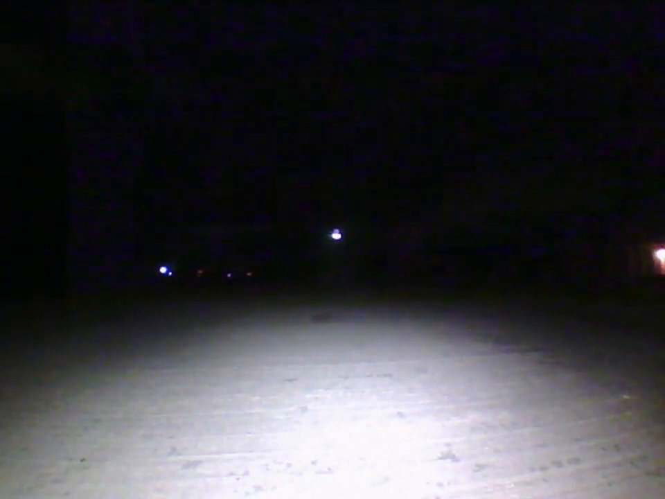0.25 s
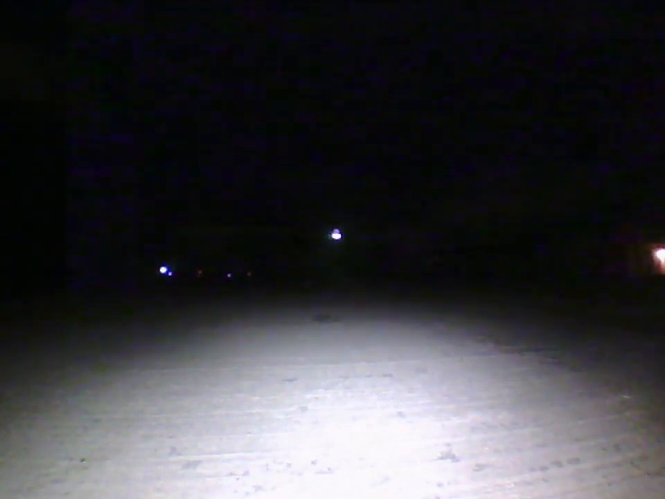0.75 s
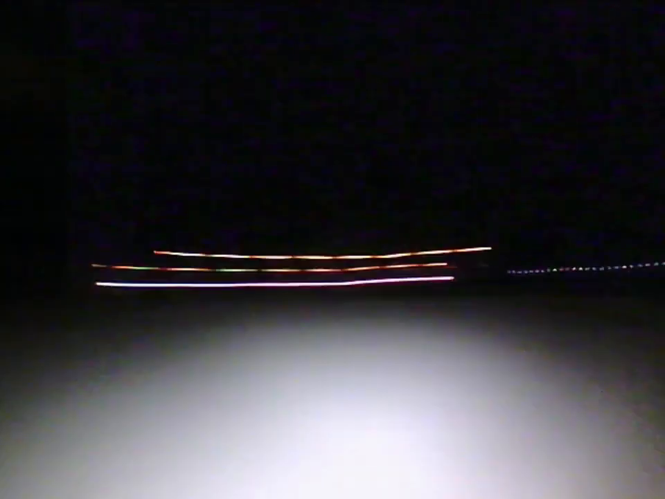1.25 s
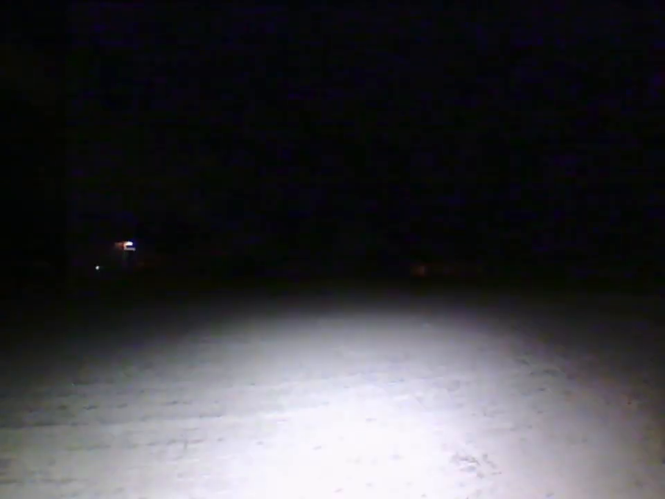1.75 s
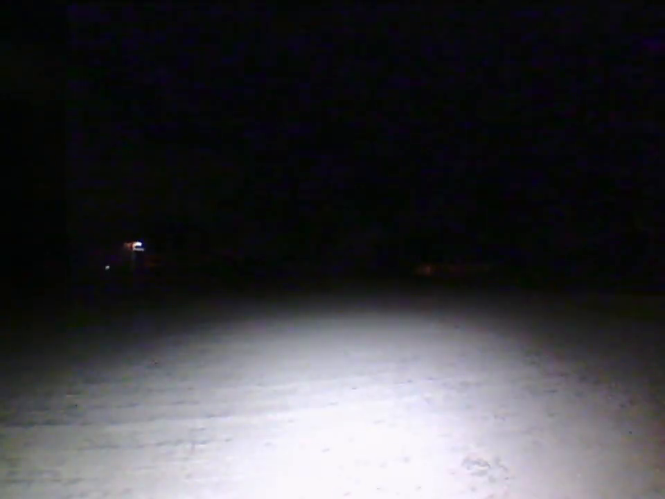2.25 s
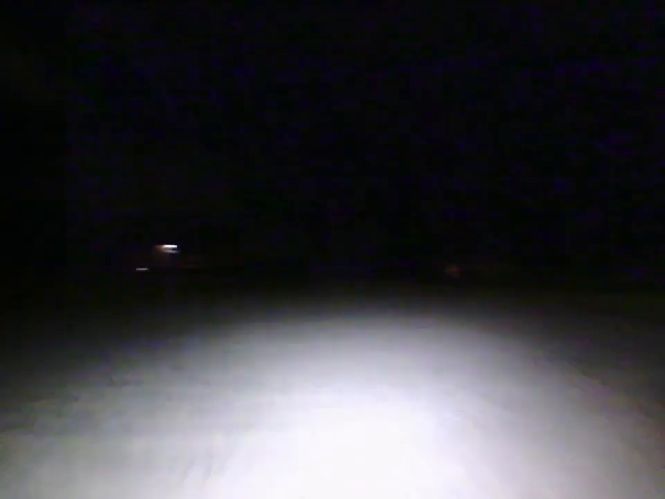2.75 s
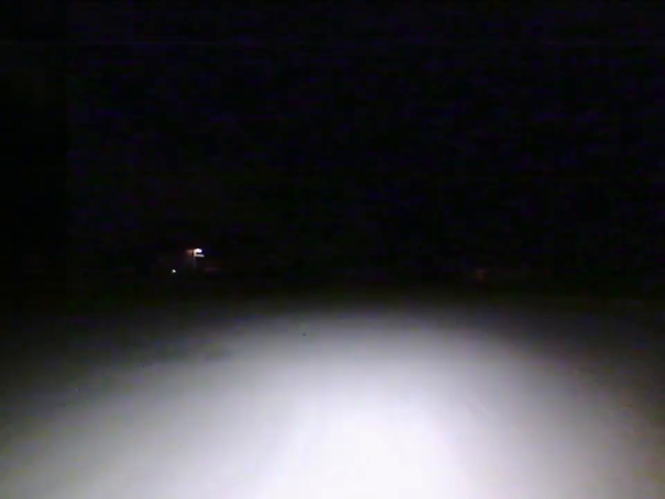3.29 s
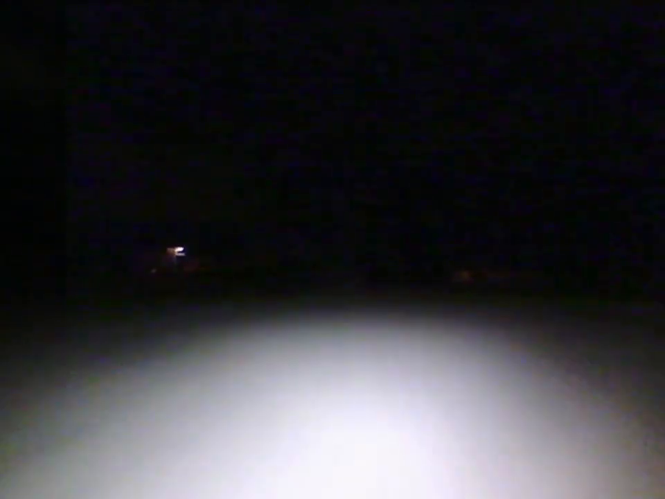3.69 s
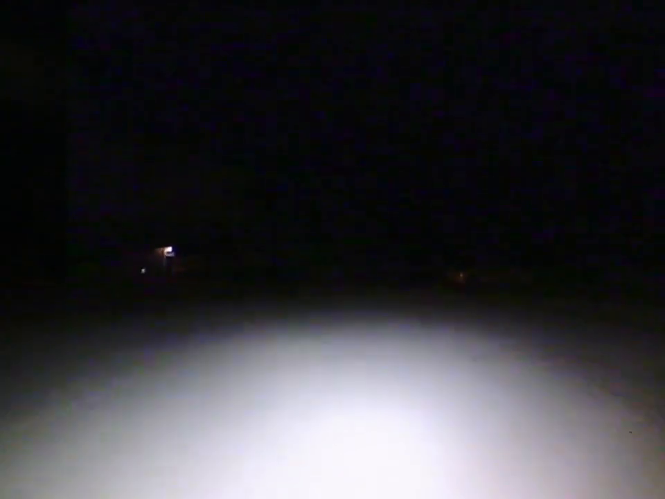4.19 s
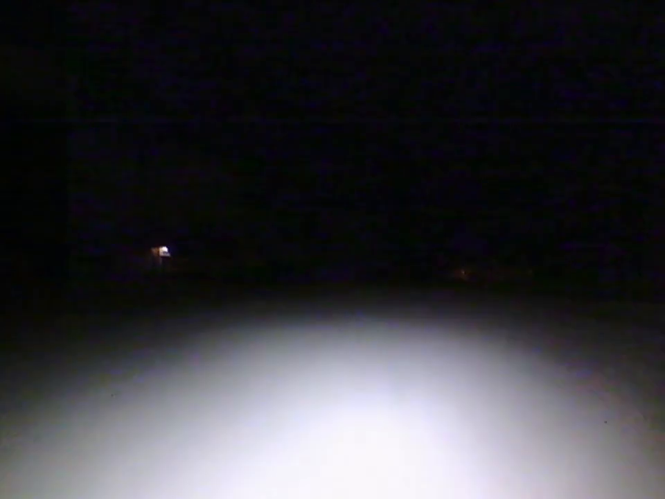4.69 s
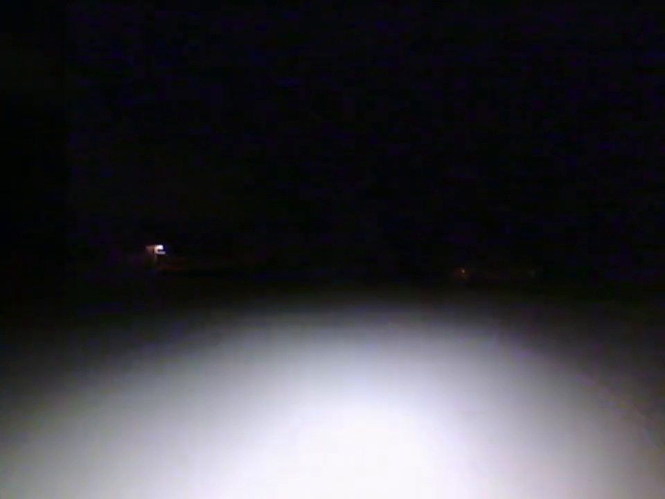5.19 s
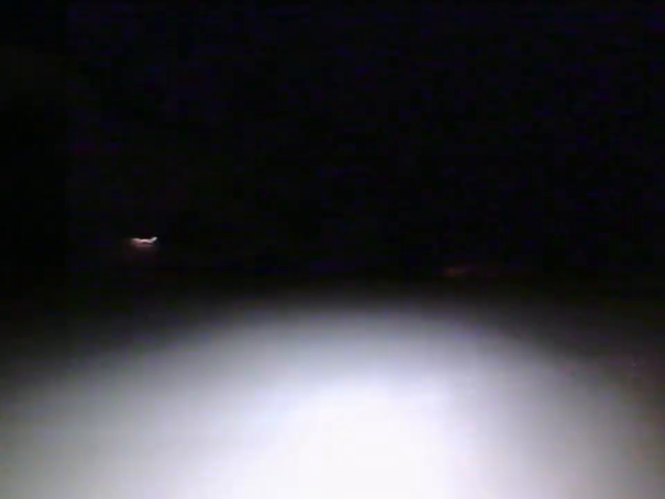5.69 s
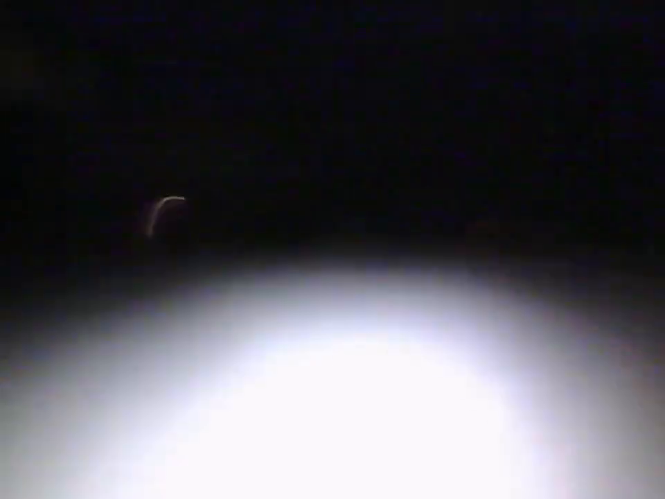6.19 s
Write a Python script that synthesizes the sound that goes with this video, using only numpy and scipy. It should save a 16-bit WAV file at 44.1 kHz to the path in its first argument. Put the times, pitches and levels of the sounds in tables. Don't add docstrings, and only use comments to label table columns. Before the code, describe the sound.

Very close, boxy, narrow-band sound from a microphone in a toy robot's shell on an asphalt road. Soft far traffic rumble and crickets come first, then a short violent burst of gear squeal, tyre scrub and plastic knocks. It settles into a dim hush and briefly goes silent. The robot then drives off, its electric whine rising over rasping grit, rattling stones and low jolts, and ends abruptly.

```python
import sys
import numpy as np
from scipy import signal
from scipy.io import wavfile

SR = 44100
rng = np.random.default_rng(int(sys.argv[2]) if len(sys.argv) > 2 else 0)


def linear_from_db(decibels):
    return 10 ** (np.asarray(decibels, float) / 20)


def to_wav(sig):
    pcm = np.clip(np.atleast_2d(sig), -1, 1) * 32767
    pcm = np.round(pcm).astype(np.int16)
    wavfile.write(sys.argv[1], SR, pcm.T)


N = 284352


def evened(x):
    return x / np.sqrt(np.mean(x ** 2) + 1e-20)


def law(points, x):
    at, *columns = np.transpose(points)
    return [np.interp(x, at, column) for column in columns]


def over_time(rows):
    return law(rows, np.arange(N) / SR)


def during(tables):
    t, gate, curves = np.arange(N) / SR, np.zeros(N), np.zeros((len(tables[0][0]) - 1, N))
    for rows in tables:
        inside = (t >= rows[0][0]) & (t < rows[-1][0])
        gate = np.maximum(gate, inside)
        curves = np.where(inside, over_time(rows), curves)
    return gate, curves


def shape(points):
    f, db = np.transpose(points)
    return lambda hz: linear_from_db(np.interp(np.log(hz + 1), np.log(f), db))


def humps(hz, modes):
    return sum(linear_from_db(2 * db) / (1 + (2 * (hz - f) / width) ** 2) ** 2 for f, width, db in modes)


def coloured(x, gain):
    log_gain = np.log(gain(abs(np.fft.fftfreq(8192, 1 / SR))) + 1e-6)
    taps = np.fft.ifft(np.exp(np.conj(signal.hilbert(log_gain)))).real[:4096]
    return signal.oaconvolve(x, taps)[:len(x)]


def drift(per_s):
    b, a = signal.butter(2, per_s, fs=SR)
    return evened(signal.lfilter(b, a, rng.standard_normal(N)))


def fuzzy_tone(hz, width_hz):
    wander = drift(width_hz / 2) + 1j * drift(width_hz / 2)
    return (wander * np.exp(2j * np.pi * np.cumsum(hz) / SR)).real


# f/Hz, level/dB per Hz
TRAFFIC = [(12, -29.5), (20, -12.5), (43, -2.5), (74, -7), (123, 3.5), (167, -14), (208, -8.5),
           (345, -18.5), (406, -13.5), (517, -20.5), (744, -21), (1110, -27), (2500, -40), (3250, -57),
           (5500, -120)]
# f/Hz, width/Hz, level/dB over the traffic
ENGINE_HUM = (140, 7, -15)
# f/Hz, level/dB per Hz
HISS = [(500, -7.5), (2000, -8), (4200, -11), (7500, -14.5)]
# f/Hz, width/Hz, level/dB over the hiss
CRICKETS = (5130, 330, -7)
# t/s, level/dB
LINK_GAIN = [(0, 0.5), (1.11, 0), (1.2, 2), (1.53, -27.5), (1.7, -16), (2.59, -15.5), (6.06, -8),
             (6.075, -8.5), (6.3, -9.5)]


def night(lumpy_db=1.0):
    gain_db, = over_time(LINK_GAIN)
    traffic_db, hiss_db = -38 + 1.41 * gain_db, -50.5 + gain_db
    traffic = evened(coloured(rng.standard_normal(N), shape(TRAFFIC)) * linear_from_db(lumpy_db * drift(7.8)))
    hum_hz, hum_width_hz, hum_db = ENGINE_HUM
    traffic += linear_from_db(hum_db) * fuzzy_tone(np.full(N, hum_hz), hum_width_hz)
    hz, width_hz, db = CRICKETS
    chorus = fuzzy_tone(hz + 40 * drift(2.3), width_hz) * linear_from_db(db + 1.2 * drift(27))
    hiss = evened(coloured(rng.standard_normal(N), shape(HISS))) + chorus
    return linear_from_db(traffic_db) * traffic + linear_from_db(hiss_db) * hiss


# f/Hz, level/dB per Hz
WOBBLE = [(12, -39.5), (20, 1), (43, 9.5), (81, 1.5), (114, 4.5), (145, 1), (177, 4), (226, -3.5),
          (253, -12.5), (344, -18), (380, -20), (490, -25.5), (840, -120)]
# t/s, level/dB, t60/s
JOLTS = [(1.13, -20, 0.71), (1.363, -22, 0.3), (1.448, -27, 0.27), (1.584, -38.5, 0.25), (1.89, -50, 0.21),
         (2.25, -58, .3), (2.43, -57.5, 0.32), (2.6, -48, 1.07), (3.499, -49, .6), (4.09, -41, 0.25),
         (4.19, -38, 1.5), (4.349, -33.5, 0.76), (4.79, -42, .3), (5.4, -39, 0.36), (5.5, -33, 0.16),
         (5.585, -34.5, .9), (5.879, -37.5, 1.2), (6.05, -45, .3), (6.125, -49, 0.47), (6.19, -54.5, 0.46)]


def rocking(lumpy_db=-0.5):
    t = np.arange(N) / SR
    rise_s, rock_db = 0.005, -21.5
    drive_end = DRIVE[-1][0]
    gate, (level_db, coarse_db) = during([DRIVE])
    power = gate * linear_from_db(2 * (level_db + rock_db + .7 * coarse_db))
    for s, db, t60 in JOLTS:
        rise = np.clip((t - s) / rise_s, 0, 1) ** 2
        heard = (t < drive_end) | (s > drive_end)
        power = power + rise * linear_from_db(2 * (db - 60 * abs(t - s) / t60)) * heard
    thuds = coloured(rng.standard_normal(N), shape(WOBBLE)) * linear_from_db(lumpy_db * drift(21.0))
    return np.sqrt(power) * evened(thuds)


def ring(modes, detune):
    t = np.arange(6000) / SR
    x = sum(linear_from_db(db - 60 * t / t60) * np.sin(2 * np.pi * hz * d * t) for (hz, db, t60), d in zip(modes, detune))
    x = x * (1 - np.exp(-t / .0004))
    return x / abs(x).max()


# t/s, peak level/dB
TICKS = [
    (1.542, -39),
    (1.553, -46),
    (1.884, -40.5),
    (2.164, -51.5),
    (2.604, -33),
    (2.614, -32.5),
    (2.666, -34),
    (2.876, -26),
    (5.973, -14),
]
# f/Hz, level/dB, t60/s
TICK_MODES = [(2670, -2.5, 0.03), (3620, -6, .008), (5480, -6, .006), (6100, -9, 0.0045),
              (7100, -5, 0.0055), (1500, -11, .008)]


def ticks():
    out = np.zeros(N + SR)
    detunes = rng.uniform(.97, 1.03, (len(TICKS), len(TICK_MODES)))
    for (s, db), detune in zip(TICKS, detunes):
        click = ring(TICK_MODES, detune)
        out[round(s * SR):][:len(click)] += linear_from_db(db) * click
    return out[:N]


# f/Hz, level/dB per Hz
SCRUB = [(250, -33), (420, -8), (1000, -2.5), (1500, -4.5), (2200, -9), (5000, -7.5), (7500, -23.5)]
# f/Hz, level/dB per Hz
SCRAPE = [(300, -20.5), (600, 8.5), (1200, 6), (2500, -7.5), (3500, -23), (7500, -28)]


def scrub(grain_db=-2.0):
    rubber = rng.standard_normal(N) * linear_from_db(grain_db * drift(600.0))
    skid, (skid_db,) = during([SPIN])
    drags = [[(s, db - treble), (s + length, db - treble - fall)] for s, length, db, fall, treble in SHUDDERS]
    rest, (rest_db,) = during(drags)
    skid_hiss = skid * linear_from_db(skid_db - 7) * evened(coloured(rubber, shape(SCRUB)))
    return skid_hiss + rest * linear_from_db(rest_db - 7.5) * evened(coloured(rubber, shape(SCRAPE)))


# t/s, length/s, multiple of the mesh, level/dB
SQUEALS = [(1.165, .018, 3.95, -16), (1.186, .011, 3.95, -14), (1.176, .014, 5.4, -19),
           (1.192, .03, 4.7, -17), (1.222, .014, 4.25, -17), (1.212, .014, 3.05, -19),
           (1.23, .02, 3.1, -19), (1.255, .03, 3.3, -21), (1.23, .016, 6.25, -21), (1.24, .05, 5.1, -21),
           (1.263, .022, 2, -18), (1.283, .039, 2, -16), (1.288, .017, 3.85, -20), (1.347, .015, 3, -21),
           (1.347, .015, 2, -21)]
# t/s, length/s, f/Hz, level/dB
HELD = [
    (1.24, .017, 3770, -14),
    (1.198, .028, 5850, -20),
    (1.265, .025, 7375, -21),
    (1.442, .014, 3850, -36),
    (1.61, .065, 1540, -58),
    (1.61, .16, 800, -67),
    (5.81, .035, 1210, -29),
    (5.99, .078, 690, -35),
]


def squeals():
    out, rough = np.zeros(N), linear_from_db(3.5 * drift(220) - 2.5)
    mesh_hz, = over_time(SPIN_SPEED)
    for rows, pitch in ((SQUEALS, mesh_hz), (HELD, np.ones(N))):
        for start, length, k, db in rows:
            at = slice(round(start * SR), round((start + length) * SR))
            glide = np.sin(2 * np.pi * np.cumsum(k * pitch[at]) / SR)
            out[at] += linear_from_db(db) * np.sqrt(2) * glide * signal.windows.tukey(len(glide), .6)
    return out * rough


# f/Hz, level/dB, t60/s
KNOCK_LOW = [(470, -11, .018), (715, 0, .018), (850, -2, .018), (1200, -6, .012), (800, -34, .3),
             (1520, -30, .15)]
KNOCK_HIGH = [(2060, 2, 0.007), (2860, -2, 0.004), (3578, -9, 0.016), (5170, -7, .004),
              (6790, -10.5, 0.0023)]


def blows(rows, gain_db, brightest_db):
    out = np.zeros(N + SR)
    detunes = rng.uniform(.95, 1.05, (len(rows), len(KNOCK_LOW) + len(KNOCK_HIGH)))
    for (s, db, bright_db), detune in zip(rows, detunes):
        bright_db = min(bright_db, brightest_db)
        low = ring(KNOCK_LOW, detune) * min(1, linear_from_db(-3.0 * (bright_db + 10.0)))
        blow = low + linear_from_db(bright_db) * ring(KNOCK_HIGH, detune[len(KNOCK_LOW):])
        out[round(s * SR):][:len(blow)] += linear_from_db(db + gain_db) * blow
    return out[:N]


# t/s, peak level/dB, bright part level/dB
KNOCKS = [(1.16, -1, -18), (1.168, -2.5, -8), (1.322, -4, -41.5), (1.374, -3, -22), (1.491, -30, -12),
          (1.507, -19.5, -9), (1.578, -13.5, -8), (1.591, -19.5, -29), (1.914, -40, -11.5),
          (2.657, -41, -1.5), (5.589, -2, -8.5), (5.645, -0.5, -8), (5.901, -8, -17)]


def knocks():
    high_pass = signal.butter(2, 230, "high", fs=SR, output="sos")
    return signal.sosfilt(high_pass, blows(KNOCKS, 0.1, 6.0))


# t/s, peak level/dB
STONES = [(3.034, -18.5), (3.113, -12.5), (3.459, -8.5), (3.501, -13.5), (3.605, -21.5), (3.775, -8.5),
          (3.925, -11), (4.063, -11), (4.084, -11.5), (4.166, -16), (4.195, -5.5), (4.232, -7), (4.28, -11),
          (4.298, -5), (4.339, -13), (4.355, -1.5), (4.413, -6.5), (4.758, -5.5), (4.79, -7.5),
          (4.916, -15), (5.02, -9), (5.037, -14), (5.146, -7.5), (5.176, -5.5), (5.202, -10.5),
          (5.453, -10.5), (5.473, -7), (5.51, -9), (5.696, -10.5), (5.724, -7)]


def stones(count=150, bright_db=-8.5, pebble_bright_db=-10.0):
    when, size = rng.random((count, 2)).T
    start, end = DRIVE[0][0], DRIVE[-1][0]
    s = start + (np.arange(count) + when) / count * (end - start)
    level_db, coarse_db = law(DRIVE, s)
    pebble_db = level_db + coarse_db + 2.5 + 5 * (2 * size - 1)
    rows = [(at, db, bright_db) for at, db in STONES]
    rows += [(at, db, pebble_bright_db) for at, db in zip(s, pebble_db)]
    return signal.sosfilt(signal.butter(3, 400, "high", fs=SR, output="sos"), blows(rows, -.5, 0))


# t/s, gear mesh f/Hz
SPIN_SPEED = [(1.12, 400), (1.165, 630), (1.215, 900), (1.245, 1010), (1.285, 1320), (1.31, 1350),
              (1.35, 1770), (1.385, 1600), (1.47, 1200)]
DRIVE_SPEED = [(2.6, 300), (2.75, 700), (2.9, 910), (3.1, 980), (3.3, 1230), (3.55, 1450), (3.7, 1520),
               (5.5, 1520), (5.65, 1480), (5.83, 1470), (5.93, 1250), (6.0, 1300)]
SECOND_MOTOR = (1.04, .97)
# mesh f/Hz, whine over rasp level/dB, low orders level/dB, top orders level/dB
WHINE = [(300, -20, -20, -8), (700, -12, -20, -12), (870, -5, -20, -15), (1000, -4, -20, -16),
         (1250, -9, -12, -11), (1520, -10, -1.5, -3)]
# multiple of the mesh, width/Hz, level/dB
LOW_ORDERS = [(.55, 60, -10), (.815, 70, -4), (1, 65, -6.5)]
# width/Hz, level/dB
LOUD_ORDERS = [(170, -2.5), (260, -4)]
TOP_ORDERS_DB = [4, 1.5, -8.5, -3.5, -13]
# f/Hz, width/Hz, level/dB
PANELS = [(2810, 200, -2), (3025, 230, -3.5), (3830, 290, 2.5), (4060, 220, 6.5), (4458, 400, 1),
          (5180, 120, -3.5), (6320, 900, -7.5), (7376, 110, 2.5)]


def gears():
    mesh_hz, = over_time(SPIN_SPEED + DRIVE_SPEED)
    skidding = np.arange(N) / SR < DRIVE_SPEED[0][0]
    whine_db, low_db, top_db = law(WHINE, mesh_hz)
    smooth_db = np.minimum(over_time(DRIVE)[1], 0)
    whine_db = np.where(skidding, -9, whine_db + 0.55 * smooth_db)
    top_db = np.where(skidding, -1.5, top_db)
    low_db = low_db - 4.9 * skidding
    first_hz = mesh_hz * (1 + .012 * drift(30))
    second_hz = mesh_hz * np.where(skidding, *SECOND_MOTOR) * (1 + .022 * drift(30))

    def order(hz, width_hz, flicker_db):
        return fuzzy_tone(hz, width_hz) * linear_from_db(flicker_db * drift(25))

    low = sum(linear_from_db(db) * order(k * first_hz, width, 1.5) for k, width, db in LOW_ORDERS)
    loud_hz = [2 * first_hz, 3 * second_hz]
    high = sum(linear_from_db(db) * order(hz, width, 3) for hz, (width, db) in zip(loud_hz, LOUD_ORDERS))
    top = sum(linear_from_db(db) * order(k * second_hz, 70 * k, 3) for k, db in zip(range(4, 9), TOP_ORDERS_DB))
    high += linear_from_db(top_db) * top
    high = coloured(high, lambda hz: np.sqrt(0.024 + humps(hz, PANELS)))
    return linear_from_db(whine_db) * (linear_from_db(low_db) * low + high)


# t/s, shell vibration level/dB
SPIN = [(1.119, -38), (1.133, -21.5), (1.146, -13.5), (1.159, -28.5), (1.165, -15.5), (1.3, -14.5),
        (1.367, -22.5), (1.376, -19.5), (1.402, -39)]
# t/s, length/s, level/dB, fall/dB, treble share level/dB
SHUDDERS = [
    (1.406, 0.066, -32, 4, -3),
    (1.474, 0.048, -38.5, 1, -4),
    (1.507, 0.027, -52, 8, -16),
    (1.54, .033, -48, 7.5, -2),
    (1.577, 0.044, -37.5, 13.5, -9.5),
    (1.625, 0.041, -58.5, 20, -19),
    (1.88, 0.055, -55.5, 4, -11.5),
]
# t/s, shell vibration level/dB, coarseness of the asphalt level/dB
DRIVE = [(2.6, -48, -8.5), (2.645, -49, -7), (2.665, -38, 12), (2.69, -48.5, 8), (2.752, -41, -0.5),
         (2.795, -37.5, 6), (3.08, -30, -0.5), (3.5, -26, 1.5), (4.3, -24.5, 1), (5.47, -21.5, -1),
         (5.67, -23.5, 0), (5.73, -26.5, 3), (5.755, -26.5, -0.5), (5.84, -24.5, -8.5), (5.895, -24, -11.5),
         (5.92, -31.5, -1.5), (5.983, -27, -4), (6.071, -30.5, -5.5)]
# mesh f/Hz, treble share level/dB
ROLL_TREBLE = [(500, -13), (760, -15.5), (930, -7), (1150, -3), (1500, -3)]


def motion():
    spin = [(s, db, -13, -5.5) for s, db in SPIN]
    rests = [[(s, db, -13.5, treble), (s + length, db - fall, -13.5, treble - 4)]
             for s, length, db, fall, treble in SHUDDERS]
    roll = [(s, db, -13.5 + coarse, 0) for s, db, coarse in DRIVE]
    gate, (level_db, low_db, treble_db) = during([spin, *rests, roll])
    rolling = np.arange(N) / SR >= DRIVE[0][0]
    roll_treble_db, = law(ROLL_TREBLE, *over_time(DRIVE_SPEED))
    return gate, (level_db, np.minimum(low_db, 0), treble_db + rolling * roll_treble_db)


# f/Hz, width/Hz, level/dB
SHELL = [(420, 9.7, -10.5), (470, 38, -6.5), (703, 60, 4.5), (800.7, 28, -3), (1184, 890, -9),
         (2140, 590, -8), (2598, 380, -3), (3544, 57, -3), (3600, 220, -9.5), (5010, 800, 0),
         (5670, 680, 2), (7165, 230, 5)]
# f/Hz, level/dB
SHELL_BETWEEN = [(100, -40), (375, -44), (400, -15.5), (1700, -13), (3300, -6.5), (6600, -1), (8000, -6.5)]


def shell(hz):
    return np.sqrt(humps(hz, SHELL) + shape(SHELL_BETWEEN)(hz) ** 2)


def motors(grain_db=1.5, throb_db=1.03):
    grit = evened(rng.standard_normal(N) * linear_from_db(grain_db * drift(660.0)))
    shaken = coloured(grit + gears(), shell)
    low = signal.sosfiltfilt(signal.butter(4, 1000, fs=SR, output="sos"), shaken)
    treble = signal.sosfiltfilt(signal.butter(4, 3300, "high", fs=SR, output="sos"), shaken)
    gate, (level_db, low_db, treble_db) = motion()
    middle_share = np.clip(1 - linear_from_db(2 * low_db) - linear_from_db(2 * treble_db), .2, 1)
    beads_db = 2.5 * drift(85) - .5
    mix = linear_from_db(low_db + 5.5 + beads_db) * evened(low)
    mix += linear_from_db(treble_db) * evened(treble)
    mix += np.sqrt(middle_share) * evened(shaken - low - treble)
    return gate * linear_from_db(level_db + throb_db * drift(38.0)) * mix


def scene():
    robot = rocking() + ticks() + scrub() + squeals() + knocks() + stones() + motors()
    return (night() + robot)[None]


def top_cut(x):
    return signal.sosfilt(signal.butter(12, 9040, fs=SR, output="sos"), x)


# t/s from, t/s to, level/dB
DROPOUTS = [
    (1.967, 2.002, -16),
    (2.001, 2.135, -200),
    (6.23, 6.5, -200),
]


def record(dry):
    t = np.arange(N) / SR
    link_hz = 16000
    x = dry[0] / (1 + (abs(dry[0]) / .55) ** 4) ** .25
    for start, end, db in DROPOUTS:
        x = np.where((t > start) & (t < end), x * linear_from_db(db), x)
    band = [(20, -5.0), (7330, -0.5), (7500, -8.5), (7800, -33), (7900, -87.5), (22000, -110)]
    x = coloured(x, shape(band))
    mirror = 2 * x * np.cos(2 * np.pi * link_hz * t)
    leak = [(20, -110), (7900, -110), (8100, 4.5), (8400, -12.0), (8660, -21.0), (9000, -37.0),
            (9200, -49), (9400, -110)]
    mix = (x + coloured(mirror, shape(leak)))[None]
    return top_cut(mix)


dry = scene()
out = record(dry)
to_wav(out)
```